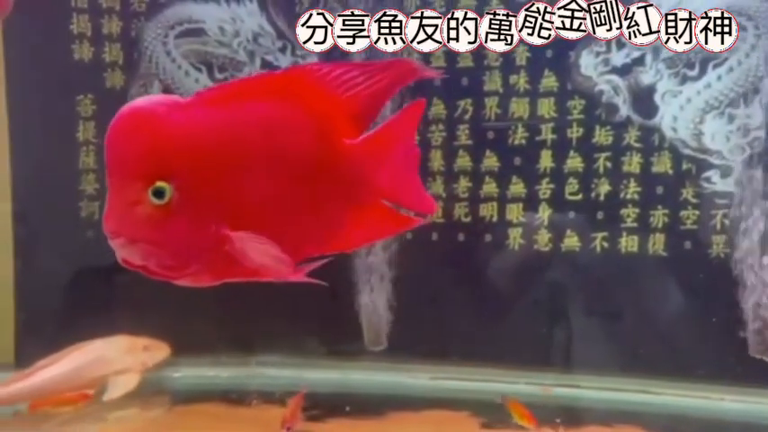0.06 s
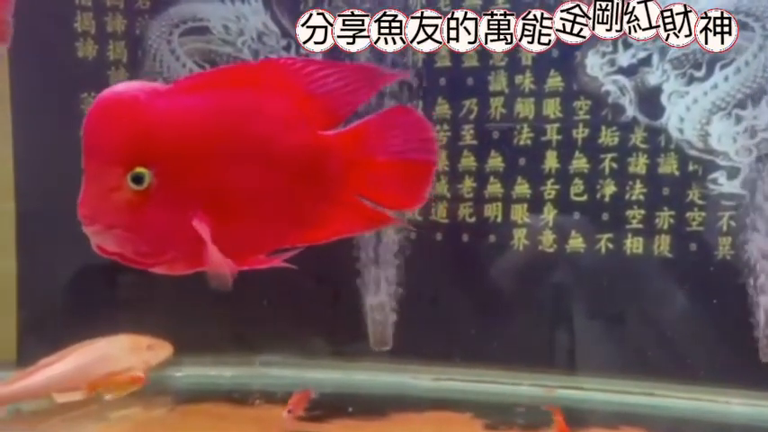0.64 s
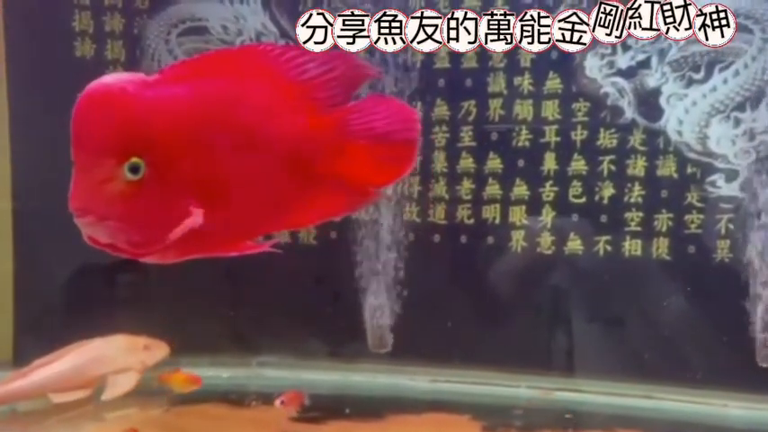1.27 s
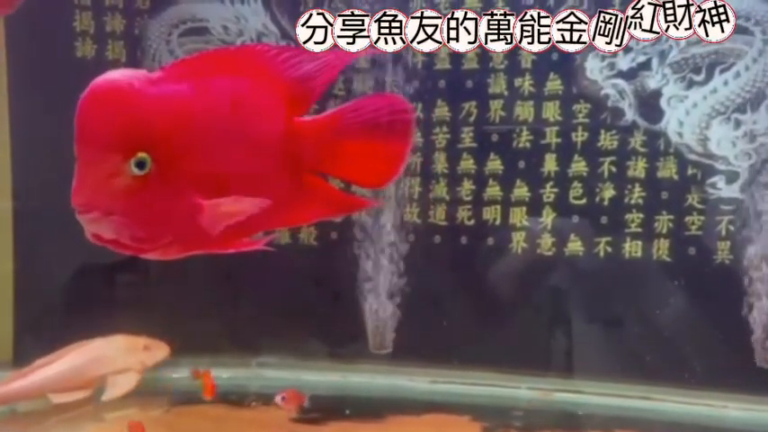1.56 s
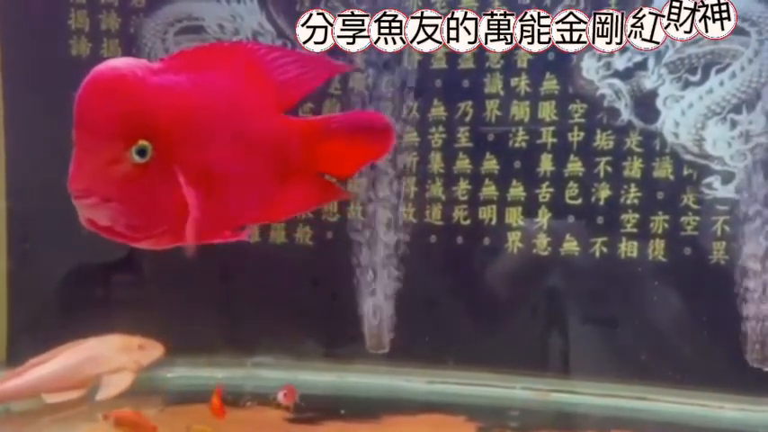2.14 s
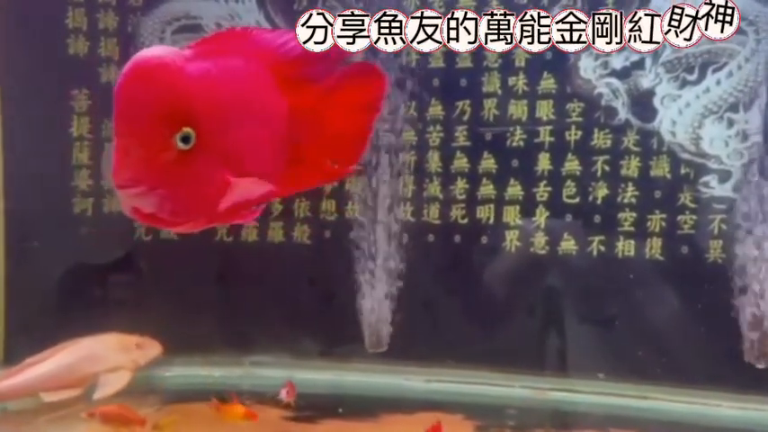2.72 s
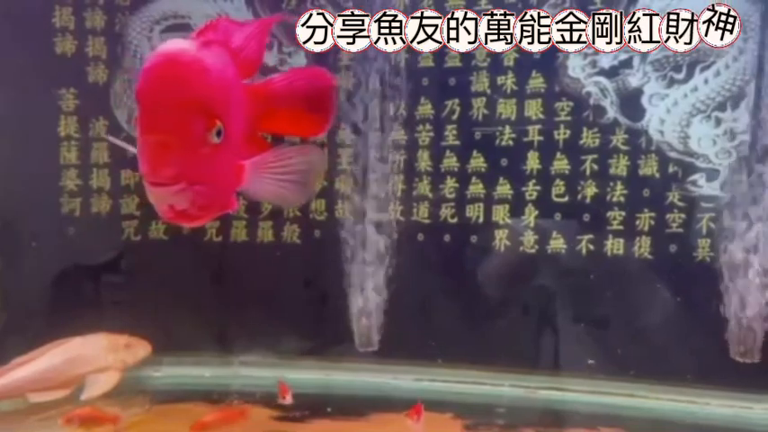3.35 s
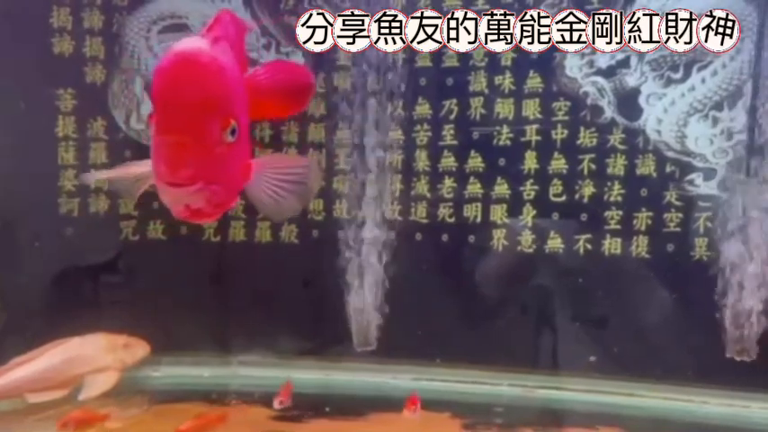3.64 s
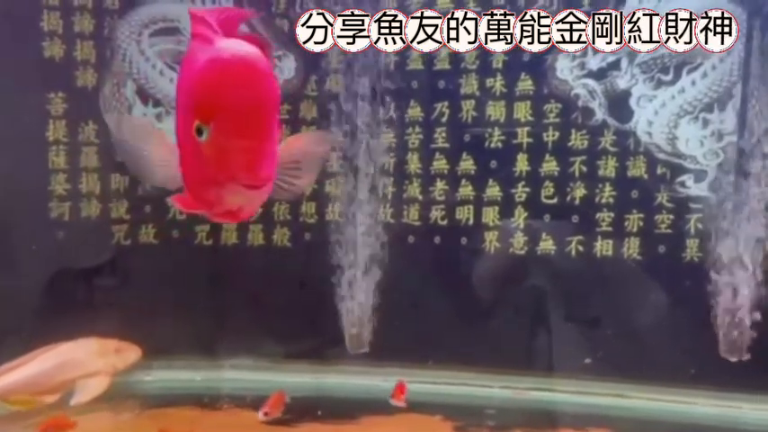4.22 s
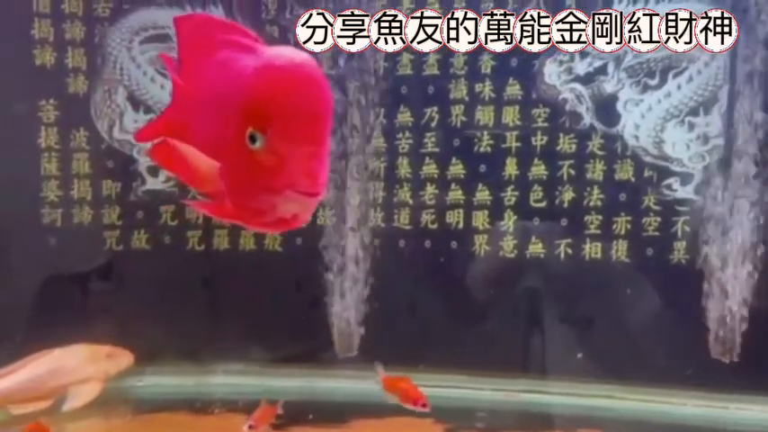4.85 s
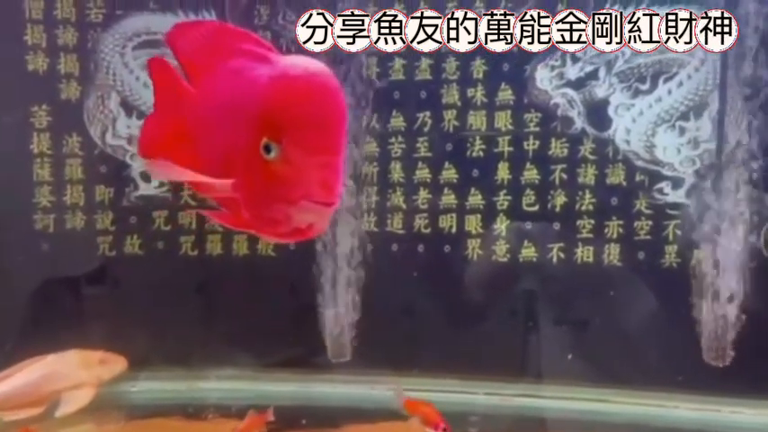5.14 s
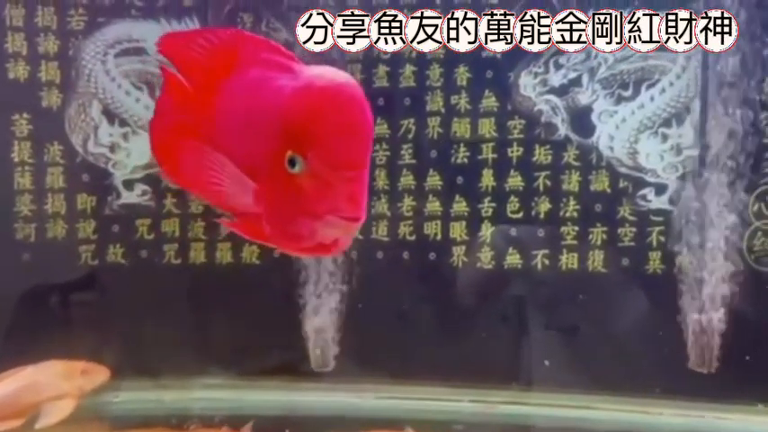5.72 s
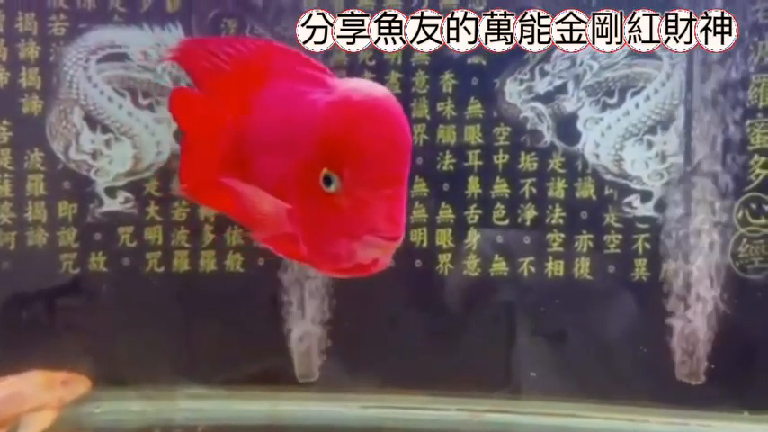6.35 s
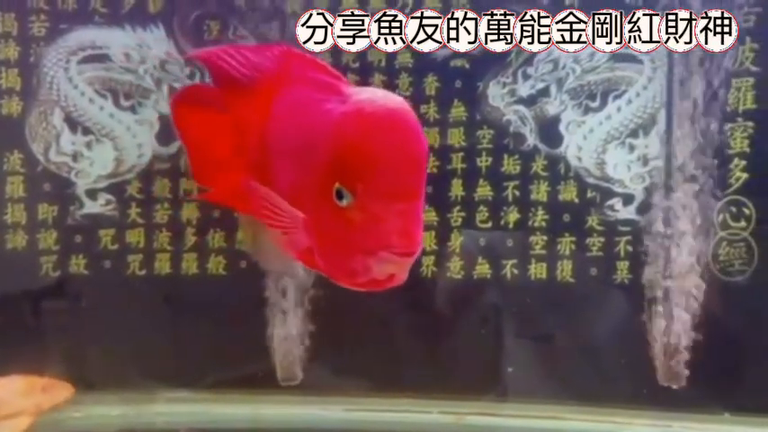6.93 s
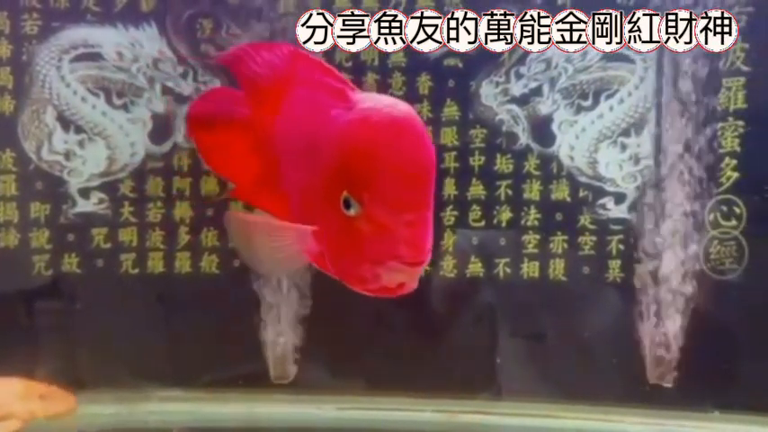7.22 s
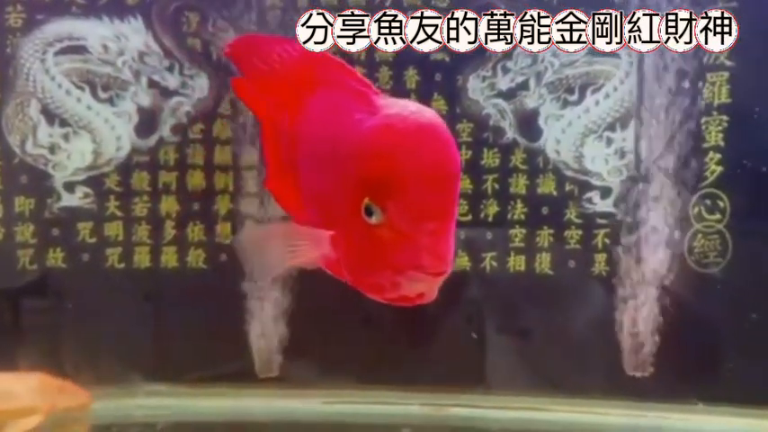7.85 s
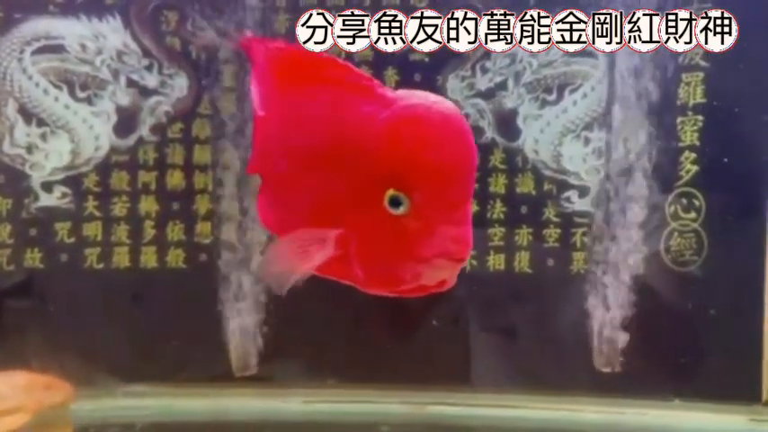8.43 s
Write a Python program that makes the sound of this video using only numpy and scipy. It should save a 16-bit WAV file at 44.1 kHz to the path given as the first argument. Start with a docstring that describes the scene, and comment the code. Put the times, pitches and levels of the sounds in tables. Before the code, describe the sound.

Water bubbles without pause in a large home aquarium, over the low electric hum of its air pump and the rumble of rising air. A fine foamy fizz sits on top, swelling briefly again and again. Small plinks, crackly splashes, short trills and low gurgles stand out here and there, a little more often in the first half. Two small microphones pick it up in stereo in a room with little echo.

```python
"""Fish tank with air pump

A pump hums beside a large glass tank in a living room, heard by two small microphones.
Rising air rumbles in the water. At the surface bubbles ring and burst, foam fizzes
and now and then sprays, and single bubbles plink, splash and gurgle out of the mass."""
import sys
import numpy as np
from scipy import signal
from scipy.fft import rfft, irfft
from scipy.io import wavfile

SR = 44100
rng = np.random.default_rng(int(sys.argv[2]) if len(sys.argv) > 2 else 0)


def wrap_up_sound(samples):
    """Save the sound to the file named by the first command line argument, as 16-bit audio."""
    columns = np.atleast_2d(samples).T
    # keep every value between -1 and 1, then stretch to whole-number steps
    tamed = np.clip(columns, -1, 1)
    steps = np.round(tamed * 32767).astype(np.int16)
    wavfile.write(sys.argv[1], SR, steps)


N = 373968
TIME_S = np.arange(N) / SR
BINS_HZ = np.fft.rfftfreq(N, 1 / SR)


def amp(db):
    """Decibels to gain."""
    return 10 ** (np.asarray(db) / 20)


def unit_rms(x):
    """Scales to rms 1."""
    return x / np.sqrt(np.mean(x ** 2) + 1e-20)


def per_bin(table):
    """Columns after the first (f/Hz), interpolated to the FFT bins over log frequency."""
    hz, *columns = np.transpose(table)
    return [np.interp(np.log(BINS_HZ + 1), np.log(hz), column) for column in columns]


def coloured(x, spectrum):
    """Filters by a gain table; rms 1."""
    return unit_rms(irfft(rfft(x) * amp(per_bin(spectrum)[0]), N))


def drift(hz):
    """Random wander below about hz; rms 1."""
    return unit_rms(irfft(rfft(rng.standard_normal(N)) * np.exp(-(BINS_HZ / hz) ** 2), N))


def bubbles(start_s, hz, gain, cycles, rise, samples):
    """Each bubble is a sine that decays to 1/e in `cycles` and rises in pitch as it surfaces."""
    turns = hz[:, None] * np.arange(samples) / SR
    age = turns / cycles
    phase = 2 * np.pi * turns * (1 + rise * np.minimum(age, 4))
    waves = gain[:, None] * np.exp(-age) * np.sin(phase)
    index = (start_s[:, None] * SR).astype(int) + np.arange(samples)
    return np.bincount(index.ravel().clip(0), waves.ravel(), N)[:N]


def swarm(low_hz, high_hz, cycles, spread_db, count, samples):
    """Two unrelated rows of count random bubbles each, later mixed into stereo."""
    rows = []
    for when, pitch, strength in rng.random((2, count, 3)).transpose(0, 2, 1):
        hz = low_hz + (high_hz - low_hz) * pitch
        gain = np.sqrt(hz) * amp(spread_db * np.minimum(-np.log(1 - strength), 5))
        rows.append(bubbles(when * N / SR, hz, gain, cycles, rise=0.013, samples=samples))
    return np.array(rows)


def room(x, direct_db, t60_s, echo_db, frame=1024, hop=256, echo_count=14):
    """Glass and walls return early echoes; then the power dies away in a tail of random phase."""
    delays = rng.integers(20, SR // 50, (2, echo_count))
    signs = rng.choice([-1, 1], (2, echo_count))
    echoes = np.zeros((2, N))
    for side, echo in np.ndindex(delays.shape):
        echoes[side] += signs[side, echo] * np.pad(x[side], (delays[side, echo], 0))[:N]
    spectra = signal.stft(x, nperseg=frame, noverlap=frame - hop)[2]
    feedback = amp(-60 * hop / SR / t60_s) ** 2
    power = signal.lfilter([0, 1 - feedback], [1, -feedback], abs(spectra) ** 2)
    diffuse = np.sqrt(power) * np.exp(2j * np.pi * rng.random(spectra.shape))
    tail = signal.istft(diffuse, noverlap=frame - hop)[1][:, :N]
    early = unit_rms(x) + amp(echo_db) * unit_rms(echoes)
    return np.std(x) * unit_rms(unit_rms(tail) + amp(direct_db) * early)


# Microphone pair: f/Hz, coherence/0-1, left lead/rad, left-right/dB
MIC_PAIR = [(40, .999, .06, -.2), (70, .997, .12, -1), (200, .98, .14, -1.3), (400, .87, -.1, -1.2),
            (600, .35, -.6, -1.6), (760, .55, -.5, -2.2), (1100, .33, -1.4, 0), (1550, .2, -4.2, -.7),
            (2000, .35, -5.7, -.6), (2550, .68, -6.9, -.4), (3200, .52, -7.5, 1.8), (4200, .54, -6.7, 1.5),
            (7000, .38, -6.4, 1.7), (8700, .5, -6.2, .2), (9600, .48, -4.3, 0), (10500, .65, -3.1, 0),
            (11500, .6, -1.6, 0)]

def microphones(pair):
    """Two unrelated signals become stereo: alike in the bass, less so and out of step higher up."""
    coherence, lead_rad, pan_db = per_bin(MIC_PAIR)
    first, second = rfft(pair)
    shared = first * np.sqrt((1 + coherence) / 2)
    apart = second * np.sqrt((1 - coherence) / 2)
    left = (shared + apart) * amp(pan_db / 2)
    right = (shared - apart) * amp(-pan_db / 2) * np.exp(-1j * lead_rad)
    return irfft(np.array([left, right]), N)


# Hum lines: mains multiple, level/dB, left-right/dB
HUM_LINES = [(1, -47, 1), (2, -34, -1.3), (4, -65, 11), (6, -60, 2.5), (10, -71, 4), (12, -73, 18),
             (14, -77.5, 18), (15, -72.5, -7)]
# Moments where the hum and the water's rumble happen to cancel or add: t/s, change/dB
INTERFERENCE = [(0.44, -8), (0.78, -6), (1.04, 5), (2.59, 6), (1.72, -2.5), (2.68, -8), (2.72, -1),
                (2.8, 3.5), (5.26, -8), (7.79, 4.5), (8.02, 3)]

def pump(mains_hz=60.0, lead_rad=0.19, waver_db=1.5, waver_hz=3.2, moment_s=0.021, grow_db_per_s=0.12):
    """The diaphragm swings with the mains; the level heard wavers and slowly grows."""
    hum = np.zeros((2, N))
    for multiple, db, pan_db in HUM_LINES:
        phase = 2 * np.pi * (multiple * mains_hz * TIME_S + rng.random())
        gains = amp([[db + pan_db / 2], [db - pan_db / 2]])
        hum += np.sqrt(2) * np.sin([phase + lead_rad, phase]) * gains
    waver = unit_rms(np.sin(2 * np.pi * waver_hz * TIME_S + np.pi * drift(hz=1.39)))
    # A gain on the hum stands in for chance interference with the rumble.
    chance_db = sum(db * np.exp(-((TIME_S - at_s) / moment_s) ** 2) for at_s, db in INTERFERENCE)
    return hum * unit_rms(amp(waver_db * waver + chance_db + grow_db_per_s * TIME_S))


# Tank and cabinet resonances: f/Hz, width/Hz, relative level/dB
TANK_MODES = [(60.3, 20.6, -1), (76.5, 23, -1.5), (115.2, 19.6, 0), (143, 23, -4), (169.7, 7.3, -1.5),
              (184, 16, -0.5), (204.4, 15.9, -1), (246, 44, -13.5), (292.4, 70, -12.5), (375, 11.7, -12.5),
              (422, 48, -15.5)]

def rumble(level_db=-37.5, low_cut_hz=48, surge_db=0.33):
    """Rising air pushes at random on water and glass, which answer in their resonances."""
    power = sum(amp(db) ** 2 / (1 + 2 * ((BINS_HZ - hz) / width_hz) ** 2) ** 2
                for hz, width_hz, db in TANK_MODES)
    response = np.sqrt(power / (1 + (low_cut_hz / (BINS_HZ + 1)) ** 10))
    envelope = amp(level_db + surge_db * drift(hz=8))
    push = rng.standard_normal((2, N))
    return envelope * unit_rms(irfft(rfft(push) * response, N))


# Tank thumps: t/s, f/Hz, relative peak/dB
TANK_THROBS = [(0.13, 188.7, -33), (0.43, 195, -40), (0.57, 200, -33), (0.93, 62, -27), (1.05, 200, -34),
               (1.18, 190, -39), (1.88, 194, -31.5), (1.97, 64.6, -29), (2.18, 61.4, -34), (2.58, 176, -33),
               (2.66, 186, -39), (3.27, 196, -30.5), (3.83, 62.6, -24), (4.93, 190, -32), (5.22, 65.5, -27),
               (5.53, 66, -36), (6.27, 62.1, -27), (7.52, 69, -36), (7.72, 185, -30.5), (7.79, 190.6, -29),
               (8.37, 66, -34)]

def throbs(gain_db=-3.5, cycles=0.97, swell_s=0.012):
    """A gulp of air heaves the water: a low tank resonance swells and fades within a few cycles."""
    out = np.zeros(N)
    for at_s, hz, db in TANK_THROBS:
        swell = np.exp(-((TIME_S - at_s) / (swell_s + cycles / hz)) ** 2)
        out += amp(gain_db + db) * swell * np.sin(2 * np.pi * (hz * TIME_S + rng.random()))
    return out


# Collapsing foam rafts: t/s, level/dB
FOAM_SPRAYS = [(0.192, -53), (0.6, -58), (0.775, -59), (0.858, -53.5), (1.045, -57), (1.542, -57),
               (1.84, -55), (1.943, -61), (2.11, -55), (2.38, -59), (2.474, -54), (2.745, -55), (2.81, -56),
               (3.305, -59), (3.44, -54), (3.58, -56), (3.915, -56), (4.035, -59), (4.169, -55),
               (4.455, -52.5), (4.825, -56), (5.062, -55), (5.22, -59), (5.367, -54), (5.71, -58),
               (6.005, -53.5), (6.475, -54), (6.665, -58), (6.77, -60), (6.905, -55.5), (7.23, -56),
               (7.7, -56), (7.93, -51), (8.21, -57)]

def sprays(rise_s=0.0019, decay_s=0.069, small_db=-64.0, spread_db=2, small_count=30):
    """Power envelope of collapsing rafts, listed ones plus small random ones: each flares and dies."""
    small = [(when * N / SR, small_db + spread_db * (2 * strength - 1))
             for when, strength in rng.random((small_count, 2))]
    start_s, db = np.transpose(FOAM_SPRAYS + small)
    impulses = np.bincount((start_s * SR).astype(int), amp(db) ** 2, N)
    age_s = TIME_S[:SR // 2]
    flare = (1 - np.exp(-age_s / rise_s)) * np.exp(-age_s / decay_s)
    return abs(signal.oaconvolve(impulses, flare ** 2)[:N])


# Colour of bursting foam: f/Hz, gain/dB
FIZZ_COLOUR = [(500, -22), (3000, -4), (4000, 0.5), (5200, -1.5), (7000, -5), (8200, -2), (9300, -2.5),
               (10600, 1.5), (11400, -0.5), (12000, -18)]

def fizz(spray_power, level_db=-58.5, grow_db_per_s=0.15, flutter_db=0.53):
    """Tiny foam films snap all the time, slowly growing louder; the fizz flares with each spray."""
    steady_db = level_db + grow_db_per_s * TIME_S + flutter_db * drift(hz=22)
    snaps = swarm(low_hz=2520, high_hz=12470, cycles=6.8, spread_db=2.5, count=20000, samples=64)
    snaps = room(snaps, direct_db=-5.0, t60_s=0.2, echo_db=0.0)
    return np.sqrt(amp(steady_db) ** 2 + spray_power) * coloured(snaps, FIZZ_COLOUR)


# Colour of surface bubbles: f/Hz, gain/dB
BUBBLING_COLOUR = [(60, -45), (280, -6.5), (500, 3.5), (620, -0.5), (760, 0.2), (950, -4.5), (1200, -0.7),
                   (1600, -4.5), (2050, -5.5), (2600, -5), (3100, -10), (4000, -15), (6000, 1)]
# Surface agitation: t/s, relative level/dB
AGITATION = [(0, -53), (1.1, -53), (2.2, -52.5), (2.6, -53), (5.5, -53), (5.9, -54), (6.3, -54), (7.0, -54),
             (7.55, -52.5), (7.85, -53.5), (8.48, -53)]

def bubbling(spray_power, gain_db=5.0, spray_db=-4, churn_db=-0.02):
    """A mass of bubbles rings at the churning surface, which each spray stirs further."""
    surface = swarm(low_hz=292, high_hz=3976, cycles=5.8, spread_db=-0.1, count=8000, samples=500)
    surface = room(surface, direct_db=-4.5, t60_s=0.57, echo_db=-3.5)
    agitation_db = np.interp(TIME_S, *np.transpose(AGITATION)) + churn_db * drift(hz=12)
    power = amp(agitation_db) ** 2 + amp(spray_db) ** 2 * spray_power
    return amp(gain_db) * np.sqrt(power) * coloured(surface, BUBBLING_COLOUR)


def tinkles(mid_db=-61.0, spread_db=3.4, low_hz=1500, high_hz=10500, db_per_octave=-7.5, count=200):
    """Faint bubbles ring at random moments; the smaller and higher, the weaker."""
    when, pitch, weakness = rng.random((count, 3)).T
    hz = low_hz * (high_hz / low_hz) ** pitch
    octaves = np.log2(hz / np.sqrt(low_hz * high_hz))
    gain = amp(mid_db - spread_db * weakness + db_per_octave * octaves)
    return bubbles(when * N / SR, hz, gain, cycles=30, rise=0.0018, samples=3000)


# Bubble chains: t/s, length/s, f/Hz, level/dB
BUBBLE_CHAINS = [(1.9, .3, 2600, -53), (2.04, 0.37, 1260, -52.5), (2.38, 0.24, 2500, -52),
                 (3.08, 0.16, 2740, -53), (3.26, .28, 2730, -57), (6.97, .3, 2580, -60)]

def trills(bubbles_per_s=110, pitch_scatter=0.087, spread_db=3):
    """A chain of bubbles of nearly one size breaks the surface in a short trill."""
    out = np.zeros(N)
    for start_s, length_s, centre_hz, db in BUBBLE_CHAINS:
        when, pitch, strength = rng.uniform(-1, 1, (int(length_s * bubbles_per_s) + 1, 3)).T
        at_s = start_s + length_s * (when + 1) / 2
        hz = centre_hz * (1 + pitch_scatter * pitch)
        out += bubbles(at_s, hz, amp(db + spread_db * strength), cycles=11, rise=0.0033, samples=3000)
    return out


# Bursts of large bubbles: t/s, centre f/Hz, level/dB
BURSTS = [(0.043, 1950, -50), (0.778, 1810, -46), (0.865, 2620, -52), (1.04, 2200, -47), (1.051, 3700, -56),
          (1.08, 2000, -50), (2.08, 1400, -50), (2.155, 2190, -54), (2.698, 1200, -52), (2.705, 3100, -53),
          (4.12, 1520, -52), (4.457, 1800, -48), (5.215, 1900, -53), (5.438, 2200, -49.5),
          (6.812, 1570, -47), (7.147, 1290, -53), (7.54, 2400, -49), (7.945, 2070, -54), (8.035, 1600, -54)]

def splashes(length_s=0.035, spread_octaves=0.435, db_per_octave=-0.5, count=36):
    """A large bubble bursts into a crackle of small, short-lived ones."""
    out = np.zeros(N)
    for start_s, centre_hz, db in BURSTS:
        at_s = start_s + length_s * rng.random(count)
        octaves = spread_octaves * rng.standard_normal(count)
        gain = amp(db + db_per_octave * octaves)
        out += bubbles(at_s, centre_hz * 2 ** octaves, gain, cycles=2.26, rise=0.0079, samples=1200)
    return out


# Merged bubbles: t/s, length/s, relative peak/dB, f/Hz, glide/octaves
MERGED_BUBBLES = [(0.264, 0.1, -45, 415, -0.076), (0.945, 0.1, -41, 382, -0.018),
                  (1.151, 0.048, -43.5, 370, 0.039), (1.203, 0.1, -42, 374, 0.0085),
                  (1.348, 0.069, -45.5, 382, 0.022), (1.495, 0.1, -44, 408, -0.076),
                  (1.55, 0.067, -40.5, 362, -0.072), (1.659, 0.082, -39, 392, -.4),
                  (2.09, 0.089, -45, 342, 0), (2.779, 0.066, -42.5, 353, 0.0045),
                  (4.104, 0.079, -40.5, 324, 0.017), (4.918, 0.12, -44, 339, 0.041),
                  (5.008, 0.12, -49, 422, -0.036), (7.73, 0.24, -46.5, 420, -0.26)]

def gurgles(gain_db=-1.5, wobble_depth=0.23):
    """Bubbles merged on the way up wobble and ring low; each swells and fades as it breaks through."""
    out = np.zeros(N)
    wobble = 1 + wobble_depth * drift(hz=40)
    for start_s, length_s, db, hz, glide_octaves in MERGED_BUBBLES:
        span = (TIME_S >= start_s) & (TIME_S < start_s + length_s)
        progress = (TIME_S[span] - start_s) / length_s
        turns = np.cumsum(hz * 2 ** (glide_octaves * (progress - 0.5))) / SR + rng.random()
        out[span] += amp(gain_db + db) * np.sin(np.pi * progress) * np.sin(2 * np.pi * turns)
    return out * wobble


# Clear bubbles: t/s, f/Hz, relative level/dB, decay/cycles, left-right/dB
CLEAR_BUBBLES = [(0.046, 1725, -41, 19, -1), (0.06, 1810, -43, 26, -3), (0.17, 6820, -51, 70, 4),
                 (0.79, 4260, -49, 40, 1), (1.047, 1436, -40.5, 30, -2), (1.053, 5420, -50, 50, 2.5),
                 (1.085, 1473, -43.5, 26, -2), (1.848, 4530, -45, 35, 1), (2.085, 1290, -43, 16, -1),
                 (2.158, 2190, -44, 24, 0), (2.707, 2940, -40, 18, 4), (2.712, 3050, -39, 16, 4),
                 (2.723, 2980, -41, 16, 4), (3.31, 4800, -46, 28, 5), (3.383, 9200, -50, 70, -1),
                 (3.445, 8530, -49, 60, 0), (3.487, 2420, -41, 34, -1), (3.59, 1110, -43, 16, 0),
                 (4.128, 1150, -43, 23, -1), (6.819, 1580, -43, 16, -1), (7.155, 1220, -40, 20, 2.5),
                 (7.235, 4600, -45, 22, 4), (7.36, 4650, -48, 20, 2), (7.425, 4200, -44, 20, -5),
                 (7.939, 7200, -51, 45, 4), (8.039, 1590, -40, 22, -1)]

def plinks(gain_db=-4.0):
    """Single bubbles ring longer and stand out, each from its own place."""
    start_s, hz, db, cycles, pan_db = np.transpose(CLEAR_BUBBLES)
    gains = [amp(db + gain_db + side * pan_db / 2) for side in (1, -1)]
    return np.array([bubbles(start_s, hz, gain, cycles[:, None], rise=0.0031, samples=5000)
                     for gain in gains])


def scene():
    """Pump hum, the mass of water and single bubbles, in stereo."""
    spray_power = sprays()
    water = microphones(rumble() + bubbling(spray_power) + fizz(spray_power))
    singles = plinks() + splashes() + trills() + tinkles() + gurgles()
    singles = room(singles, direct_db=7.0, t60_s=0.16, echo_db=-4.0)
    return pump() + water + throbs() + singles


def record(dry):
    """Steep low-pass on both channels."""
    cutoff_hz = 11850
    taps = signal.firwin(511, cutoff_hz, window=("kaiser", 9), fs=SR)
    return signal.oaconvolve(dry, taps[None], "same", axes=1)


dry = scene()
out = record(dry)
wrap_up_sound(out)
```